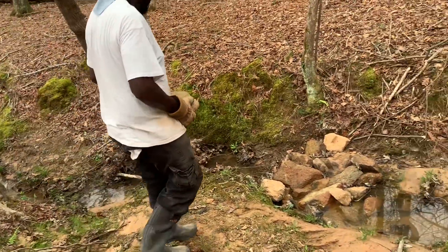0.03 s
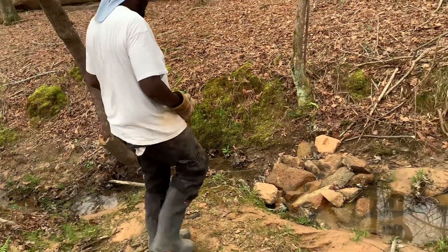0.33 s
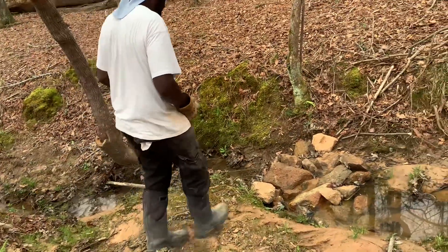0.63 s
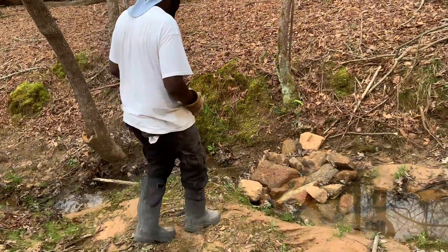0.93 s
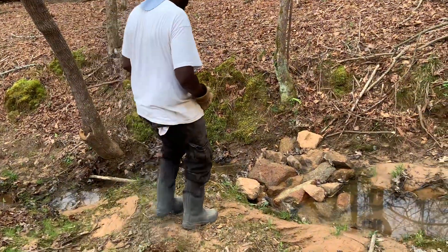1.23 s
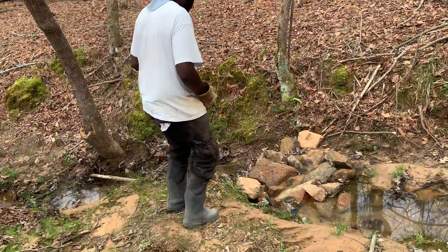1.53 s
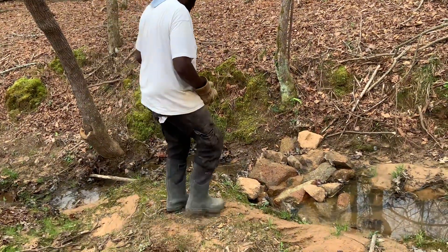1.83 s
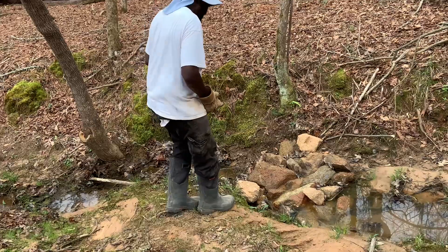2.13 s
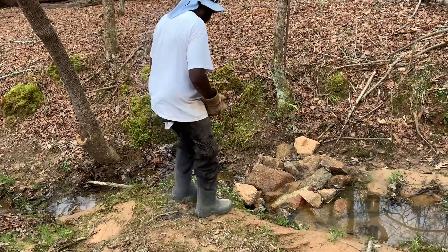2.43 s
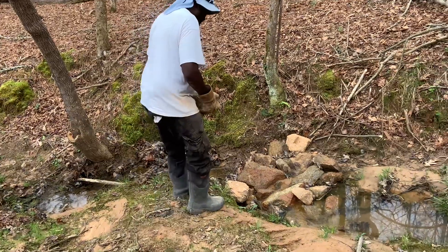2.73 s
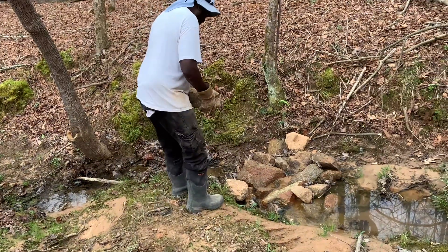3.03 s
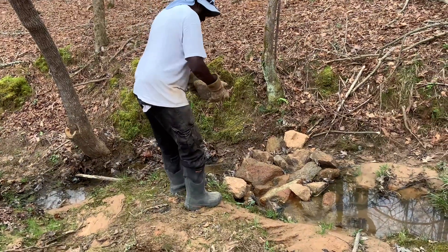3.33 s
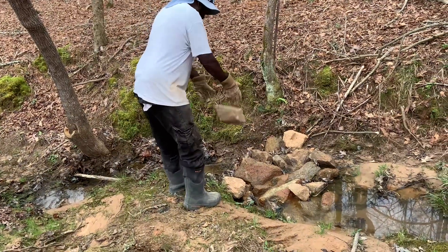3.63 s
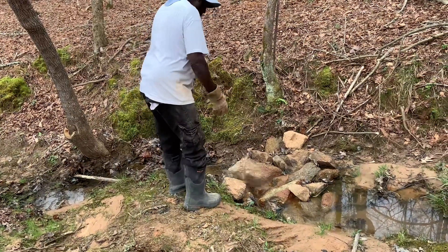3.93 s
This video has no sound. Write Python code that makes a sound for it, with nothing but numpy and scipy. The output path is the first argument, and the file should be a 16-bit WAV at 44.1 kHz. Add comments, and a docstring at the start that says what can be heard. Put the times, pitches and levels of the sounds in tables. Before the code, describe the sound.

Soft scuffing steps through dry leaves, then one tossed rock cracks loudly against stones.

```python
"""On the gritty, leaf-strewn bank of a woodland creek, a man shuffles about in rubber boots.
His soles hiss over sand, crush leaves and snap twigs. He tosses a rock onto a pile of stones:
it lands with a crack and a heavy thud, knocks again and scatters grit while the pile rings briefly.
Faint birds call far off, and a low rumble swells and sinks under it all."""
import sys
import numpy as np
from scipy import signal
from scipy.fft import rfft, irfft
from scipy.io import wavfile
from scipy.ndimage import uniform_filter1d, minimum_filter1d

SR = 44100
rng = np.random.default_rng(int(sys.argv[2]) if len(sys.argv) > 2 else 0)


def int16_out(signal):
    """Quantize to a 16-bit WAV file."""
    q = np.round(np.clip(np.atleast_2d(signal).T, -1, 1) * 32767)
    wavfile.write(sys.argv[1], SR, q.astype(np.int16))


N = 176400  # 4 seconds


def from_db(db):
    """Turn decibels into a number to multiply by."""
    return 10 ** (np.asarray(db) / 20)


def rms_one(x):
    """Scale a sound so its average strength (rms) is 1."""
    return x / np.sqrt(np.mean(x ** 2) + 1e-20)


def clock():
    """The time of every sample, in seconds."""
    return np.arange(N) / SR


def swell(s, rise, fall):
    """A loudness curve that peaks at time s and is 20 dB down one rise before and one fall after."""
    t = clock() - s
    return from_db(-20 * np.minimum(np.maximum(-t / rise, t / fall), 10))


def decay(s, fade_s):
    """A loudness curve that starts at time s and drops 60 dB over the fade time."""
    t = clock() - s
    return (t >= 0) * np.exp(-np.log(1000) * np.clip(t / fade_s, 0, 10))


def drift(seconds, count=N):
    """A smooth random wobble of about size 1; more seconds make it slower."""
    size = max(2, int(seconds * SR))
    return rms_one(uniform_filter1d(uniform_filter1d(rng.standard_normal(count), size), size))


def clumps():
    """A quick flutter in loudness, because grains come in clumps."""
    return from_db(2.5 * drift(0.011))


def colour(x, tone):
    """Shape a sound's tone by (pitch [Hz], level [dB]) points, falling steeply outside them."""
    hz, db = np.transpose(tone)
    octave, points = np.log2(np.arange(N // 2 + 1) * SR / N + 1e-3), np.log2(hz)
    outside = np.abs(octave - np.clip(octave, points[0], points[-1]))
    gain = from_db(np.interp(octave, points, db) - 17.7 * outside)
    return rms_one(irfft(rfft(x) * gain, N))


def resonate(x, hz, width_hz):
    """Keep the part of a sound near one pitch, so it rings there."""
    r = np.exp(-np.pi * width_hz / SR)
    feedback = [1, -2 * r * np.cos(2 * np.pi * hz / SR), r * r]
    return signal.lfilter(np.array([1, 0, -1]) * (1 - r * r) / 2, feedback, x)


def wide_noise(side_db):
    """Stereo noise; a higher side_db makes the two ears less alike."""
    mid, side = rng.standard_normal((2, N))
    return mid + from_db(side_db) * side * [[1], [-1]]


def place(x, echo_db, left_db=0.5):
    """Set a sound a little to the left and add its dull echo from trunks and banks."""
    scatter = wide_noise(side_db=0.5) * decay(0.0079, fade_s=0.41)
    dull_tail = signal.lfilter([1], [1, -.45], scatter[:, :SR])
    echo = signal.fftconvolve(x[None], rms_one(dull_tail) / np.sqrt(SR), axes=1)[:, :N]
    return x * from_db([[left_db / 2], [-left_db / 2]]) + from_db(echo_db) * echo


def background():
    """A deep rumble with a hollow hum that swells and sinks, and the faint hiss of the woods."""
    # swells of the rumble: (peak time [s], rise [s], fall [s], hum level [dB], upper level [dB])
    swells = [(.1, 0.42, 1, -80, -53.5), (.56, 0.34, 0.39, -44.5, -56.5), (.72, 0.11, 0.18, -46.5, -45.5),
              (1.281, 0.17, 0.21, -44.5, -55), (1.368, 0.083, 0.19, -51, -46.5),
              (1.86, 0.65, 0.6, -46, -52.5), (2.279, 0.25, 0.27, -41.5, -46),
              (2.53, 0.3, 0.44, -42.5, -53.5), (3.168, 0.16, 0.28, -43, -77)]
    # tones of the upper rumble, the deep rumble and the hiss: (pitch [Hz], level [dB])
    upper_tone = [(170, -2.5), (240, 1.5), (330, 5), (450, -5.5), (560, -19.5), (750, -37.5), (1100, -41),
                  (2000, -82)]
    deep_tone = [(20, -18), (35, -23), (52, 2), (85, -2), (120, 2.5), (170, -3), (260, -24)]
    air_tone = [(300, 20.5), (700, 13), (1200, -4), (2500, -0.5), (5000, -4), (8500, -7.5), (11000, 1),
                (15500, -15)]
    hum_hz, width_hz = 159, 35.3
    broad_hum = resonate(wide_noise(side_db=-17), hum_hz, 2 * width_hz)
    hum = rms_one(resonate(broad_hum, hum_hz, width_hz))
    hum *= from_db(-55.5) + sum(from_db(db) * swell(s, rise, fall) for s, rise, fall, db, _ in swells)
    upper = colour(wide_noise(side_db=-6.5), upper_tone)
    upper *= from_db(-64) + sum(from_db(db) * swell(s, rise, fall) for s, rise, fall, _, db in swells)
    deep = from_db(-48.5) * colour(wide_noise(side_db=-15.5), deep_tone)
    air = from_db(-72) * colour(wide_noise(side_db=1), air_tone)
    return (hum + upper + deep) * from_db([[-1.1], [1.1]]) + air


def bird_note(s, length, start_hz, end_hz, db):
    """One almost pure note that glides and wavers in pitch."""
    progress = np.linspace(0, 1, int(length * SR))
    waver = 1 + 0.028 * drift(0.006, count=SR)[:len(progress)]
    hz = (start_hz + (end_hz - start_hz) * progress) * waver
    loudness = from_db(db) * np.sqrt(np.abs(np.sin(np.pi * progress)))
    out, first = np.zeros(N + SR), int(s * SR)
    out[first:first + len(hz)] = loudness * np.sin(2 * np.pi * np.cumsum(hz) / SR)
    return out[:N]


def birds():
    """A fast trill of rising notes and a few far whistles, blurred by the trees."""
    # far whistles: (time [s], length [s], pitch [Hz], level [dB])
    calls = [(1.007, 0.084, 2480, -81.5), (1.531, 0.09, 2470, -74.5), (2.84, 0.1, 2430, -85),
             (2.92, 0.25, 3080, -87.5), (3.22, 0.28, 2920, -86), (3.275, 0.13, 2490, -86),
             (3.55, 0.2, 2940, -86.5)]
    trill_db = -77 - 5 * np.linspace(-1, 1, 19) ** 2  # 19 notes, loudest in the middle
    trill = sum(bird_note(1.45 + k * 0.058, length=0.056, start_hz=3300, end_hz=5100, db=db)
                for k, db in enumerate(trill_db))
    whistles = sum(bird_note(s, length, hz, hz, db) for s, length, hz, db in calls)
    return place(trill + whistles, echo_db=1.5, left_db=3)


def grains(tone, ticks_per_s=900, spread_db=3):
    """Countless tiny breaks of uneven size over a smooth rubbing hiss."""
    sizes = from_db(spread_db * np.minimum(rng.exponential(1, N), 5)) * rng.choice([-1, 1], N)
    ticks = rms_one(sizes * (rng.random(N) < ticks_per_s / SR))
    hiss = 0.95 * rng.standard_normal(N)
    return colour((ticks + hiss) * clumps(), tone)


def snaps(rows):
    """Short snaps or clicks, each a dying burst of noise around one pitch."""
    out, t = np.zeros(N + SR), np.arange(SR // 10) / SR
    for (s, db, hz), noise in zip(rows, rng.standard_normal((len(rows), len(t)))):
        fade_s = 0.024 / (hz / 1000) ** 0.39  # higher snaps die sooner
        fade = np.exp(-np.log(1000) * t / fade_s)
        width_hz, first = 0.32 * hz, int(s * SR)
        burst = fade * resonate(resonate(noise, hz, width_hz), hz, width_hz)
        out[first:first + len(t)] += from_db(db) / 2 * rms_one(burst) * np.sqrt(np.mean(fade ** 2))
    return out[:N]


def rasp(width_hz=600):
    """The dry rasp of the first steps: grainy noise that sinks a little in pitch."""
    # course of the rasp: (time [s], pitch [Hz], level [dB])
    course = [(.08, 2050, -85), (.33, 1896, -69), (.52, 1700, -70), (.88, 1748, -80), (1.02, 1750, -87)]
    s, hz, db = np.transpose(course)
    low_pass = signal.butter(4, width_hz / 2, fs=SR, output="sos")
    low_noise = signal.sosfilt(low_pass, rng.standard_normal((2, N)))
    phase = 2 * np.pi * np.cumsum(np.interp(clock(), s, hz)) / SR
    band = low_noise[0] * np.cos(phase) + low_noise[1] * np.sin(phase)  # moved up to the pitch
    return rms_one(band * clumps()) * np.interp(clock(), s, from_db(db), left=0, right=0)


def footsteps():
    """Soles drag over sand and crush leaves, twigs snap and clothes rub."""
    # boot scuffs: (peak time [s], rise [s], fall [s], hiss level [dB], crunch level [dB])
    scuffs = [(0.028, 0.06, 0.091, -59.5, -61), (0.363, 0.14, 0.11, -57.5, -60),
              (0.464, 0.025, 0.097, -56, -58.5), (.585, 0.028, 0.05, -69, -65),
              (0.671, 0.039, 0.076, -56, -56.5), (.87, 0.071, 0.46, -72, -72.5),
              (1.357, 0.025, 0.046, -57.5, -54), (1.384, 0.013, 0.029, -51.5, -61.5),
              (1.45, 0.044, 0.072, -62.5, -73.5), (1.555, 0.068, 0.076, -60.5, -69),
              (1.68, 0.042, 0.078, -69, -88), (1.765, 0.12, 0.12, -66, -69.5),
              (2.005, 0.052, 0.053, -51.5, -53.5), (2.164, 0.085, 0.23, -65, -68),
              (2.573, 0.036, 0.05, -56, -64), (2.655, 0.042, 0.05, -66, -72.5),
              (3.17, 0.056, 0.065, -73, -89), (3.514, 0.065, 0.031, -56.5, -56)]
    # clothes rubbing: (peak time [s], rise [s], fall [s], level [dB])
    rubs = [(.075, 0.049, 0.095, -53), (0.186, .05, 0.15, -54)]
    # tones of sand, of leaves and soil, and of cloth: (pitch [Hz], level [dB])
    sand_tone = [(2400, -3), (3200, 0), (4500, -1.5), (6500, 3), (7700, -4), (9300, 3.5), (12500, -4.5),
                 (15500, -8)]
    leaf_tone = [(400, 0), (700, 6), (1100, 5.5), (1600, 7), (2200, 5), (3000, -9)]
    cloth_tone = [(400, 1), (600, 3.5), (800, -8.5), (1100, -19.5), (2000, -22)]
    # twigs, leaves and grit snapping: (time [s], level [dB], pitch [Hz])
    twigs = [(0.026, -43, 4400), (.058, -45.5, 650), (.092, -46.5, 720), (.326, -52, 7050),
             (.351, -46, 6000), (.382, -42.5, 6400), (.41, -46.5, 5770), (.457, -45, 1060),
             (0.5245, -37, 1600), (0.568, -48.5, 1180), (.646, -43.5, 6800), (.759, -46.5, 670),
             (0.816, -48.5, 644), (0.988, -49, 6600), (1.046, -52.5, 696), (1.344, -45.5, 1440),
             (1.344, -48.5, 6500), (1.377, -43, 6150), (1.382, -39, 10600), (1.468, -51, 6900),
             (2.5, -57.5, 990), (2.572, -35.5, 9900), (2.953, -47, 10000), (3.335, -53.5, 3060),
             (3.397, -44, 6070)]
    hiss = grains(sand_tone) * sum(from_db(db) * swell(s, up, down) for s, up, down, db, _ in scuffs)
    crunch = grains(leaf_tone) * sum(from_db(db) * swell(s, up, down) for s, up, down, _, db in scuffs)
    cloth = grains(cloth_tone) * sum(from_db(db) * swell(s, up, down) for s, up, down, db in rubs)
    return place(hiss + crunch + cloth + rasp() + snaps(twigs), echo_db=-13)


def strike(s, notes, sag=0):
    """A hit rings a thing's own notes, swinging opposite ways in turn; sag is pitch share lost a second."""
    t = np.clip(clock() - s, 0, 1)
    slowed = t - sag * t * t / 2
    return sum((-1) ** k * from_db(db) * decay(s, fade_s) * np.sin(2 * np.pi * hz * slowed)
               for k, (hz, db, fade_s) in enumerate(notes))


def push(s, notes, rise_s, sag=0):
    """A heavy contact: the ringing builds up while the load grows."""
    return strike(s, notes, sag) * np.clip((clock() - s) / rise_s, 0, 1)


def grit(landing_s):
    """Sand sprays up just after the rock lands, then trickles down."""
    # tone of flying sand: (pitch [Hz], level [dB])
    tone = [(600, 7), (1000, 5), (2500, 1.5), (5000, -3), (10500, 4.5), (15500, -2.5)]
    spray = from_db(-39) * swell(landing_s + 0.0342, rise=0.054, fall=0.025)
    trickle = from_db(-45.5) * decay(landing_s, fade_s=0.59)
    return grains(tone) * (spray + trickle) * (clock() > landing_s)


def rock(landing_s=3.8448, thud_delay_s=0.00091):
    """Each hit crushes the surface, rings the rock and thumps the pile; grit flies and a stone settles."""
    # the rock hitting the pile: (time after landing [s], crack level [dB], thud level [dB])
    hits = [(0, -20.5, -3), (0.0276, -44, -27), (.036, -43, -30.5)]
    # tone of the crack: (pitch [Hz], level [dB])
    crack_tone = [(600, 0), (900, 21), (1200, -2), (2400, 6.5), (3650, 5), (4800, -10), (8000, -7),
                  (10500, 6.5), (13000, -16)]
    # ringing of the rock, of rock and pile together, and of a stone rocking under the load:
    # (pitch [Hz], level [dB], fade time [s])
    clink_notes = [(1495, -35.5, 0.076), (2280, -33.5, 0.038), (2510, -39, .06), (3630, -23, 0.014),
                   (6170, -35, 0.022)]
    thud_notes = [(151.3, -9.5, 0.069), (246, 1, 0.051), (361, 6, 0.025), (463, -1, 0.034),
                  (621, -15, 0.076), (734, -10.5, 0.025), (882, -11, 0.026)]
    settle_notes = [(209, -14.5, .11), (436, -26, 0.083)]
    # loose stones clicking: (time [s], level [dB], pitch [Hz])
    pebbles = [(3.872, -27.5, 880), (3.873, -28, 1500), (3.913, -40, 7200), (3.916, -39, 1100),
               (3.946, -39.5, 1300), (3.952, -43.5, 1500), (3.968, -42, 1000), (3.995, -46, 1900)]
    crack = colour(rng.standard_normal(N), crack_tone)
    crack *= sum(from_db(db) * decay(landing_s + s, fade_s=0.011) for s, db, _ in hits)
    first_hit_db = hits[0][1]
    clink = sum(from_db(db - first_hit_db) * strike(landing_s + s, clink_notes) for s, db, _ in hits)
    thud = sum(from_db(db) * push(landing_s + thud_delay_s + s, thud_notes, rise_s=0.0003)
               for s, _, db in hits)
    settle = push(landing_s + 0.0392, settle_notes, rise_s=0.013, sag=0.83)  # sinks as it beds in
    bright = crack + clink + grit(landing_s) + snaps(pebbles)
    return place(bright, echo_db=-16) + place(thud + settle, echo_db=-29)


def scene():
    """Everything on the creek bank, in stereo."""
    return footsteps() + rock() + birds() + background()


def stereo_processing(x):
    """The phone's stereo processing makes left and right differ in level and timing, pitch by pitch."""
    # left compared with right: (pitch [Hz], louder by [dB], ahead by [radians])
    sides = [(250, 0, .1), (600, -4.4, .4), (1300, -2.8, .3), (3000, -2, 2), (5500, -3, .8), (6600, 0, -.2),
             (7400, 0, -.6), (8600, 0, -3.1), (10600, 0, -6.2), (13200, 0, -9.3), (15200, 0, -12.5)]
    points, db, radians = np.transpose(sides)
    hz = np.arange(N + 1) * SR / (2 * N)
    tilt = from_db(np.interp(hz, points, db) / 2)
    lead = np.exp(1j * np.interp(hz, points, radians))
    return irfft(rfft(x, 2 * N) * np.array([tilt * lead, 1 / tilt]))[:, :N]


def record(dry):
    """The phone shapes the stereo, quickly turns down the loudest peaks and cuts the highest treble."""
    ceiling, window, cutoff_hz = 0.95, int(0.0007 * SR), 15900
    x = stereo_processing(dry)
    gain = ceiling / np.maximum(np.abs(x).max(axis=0), ceiling)
    limited = x * uniform_filter1d(minimum_filter1d(gain, window), window)
    return signal.sosfilt(signal.ellip(10, .1, 80, cutoff_hz, fs=SR, output="sos"), limited)


dry = scene()
out = record(dry)
int16_out(out)
```